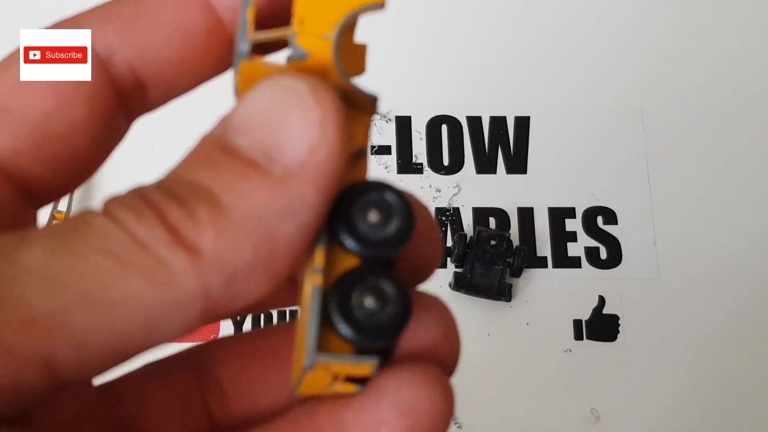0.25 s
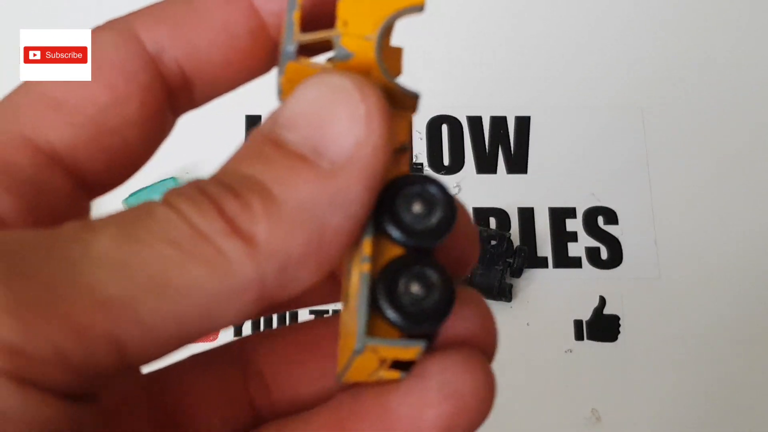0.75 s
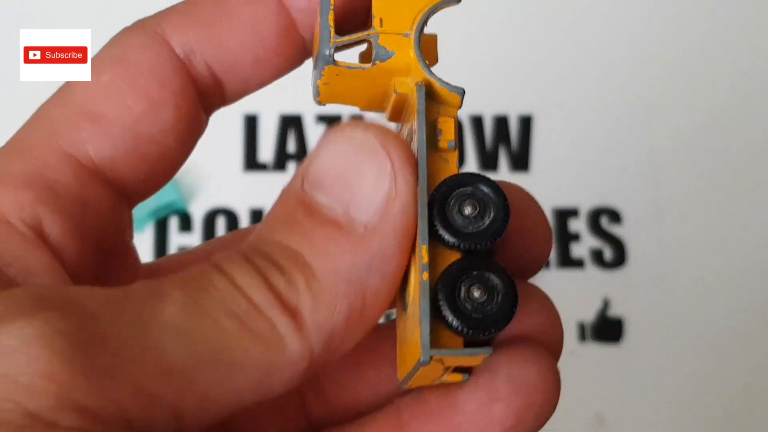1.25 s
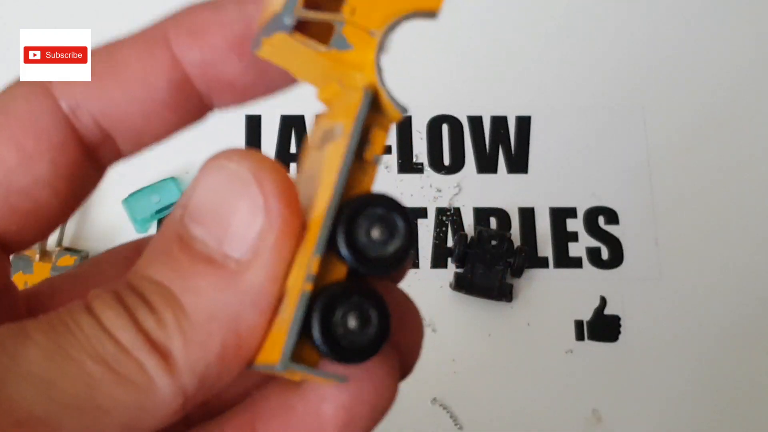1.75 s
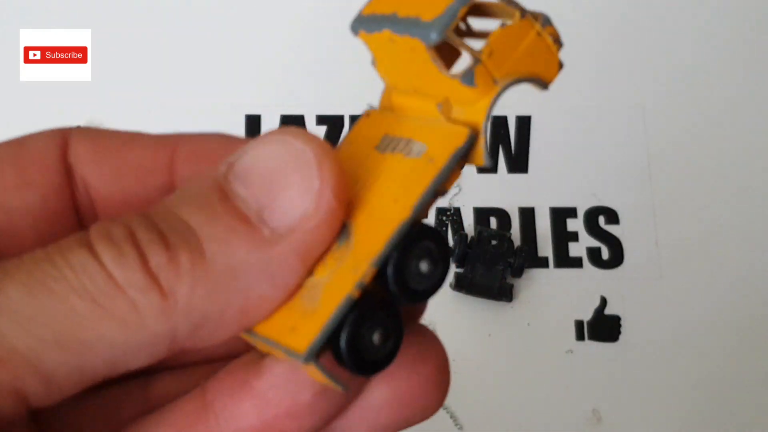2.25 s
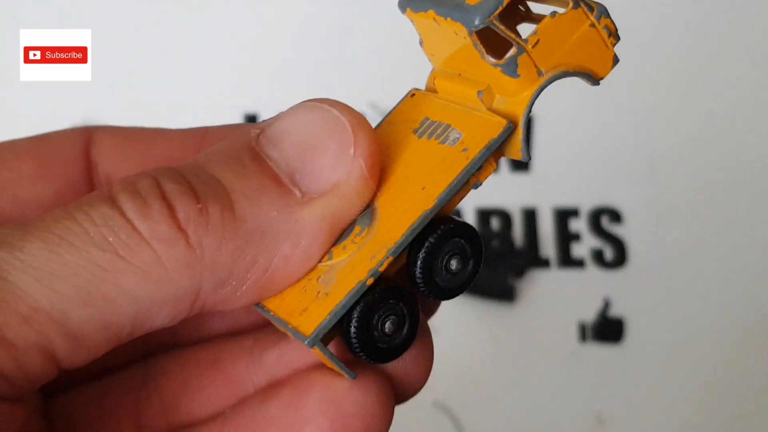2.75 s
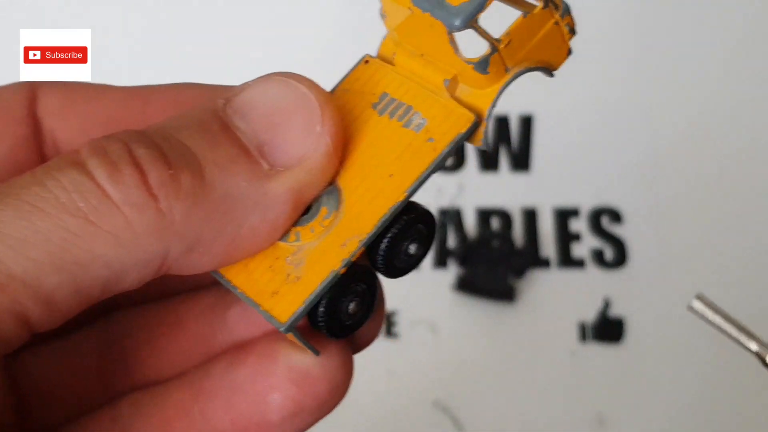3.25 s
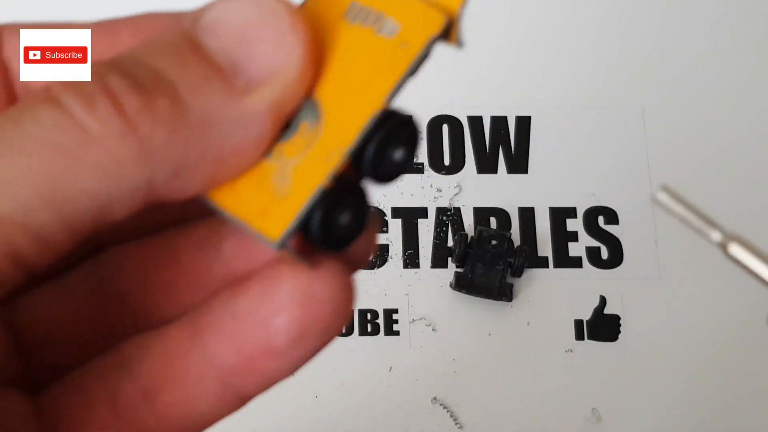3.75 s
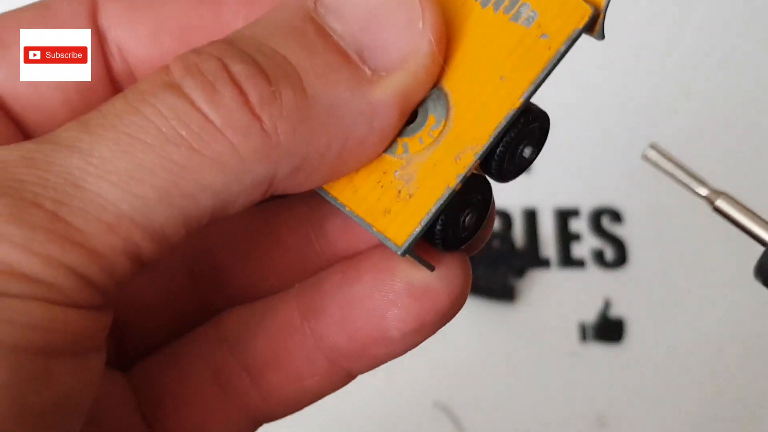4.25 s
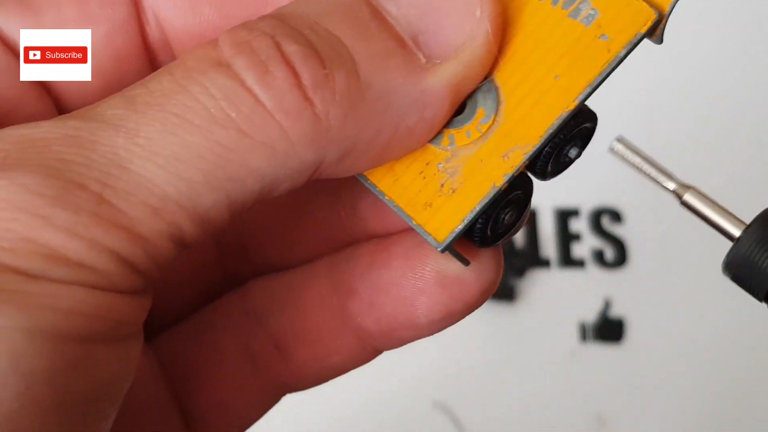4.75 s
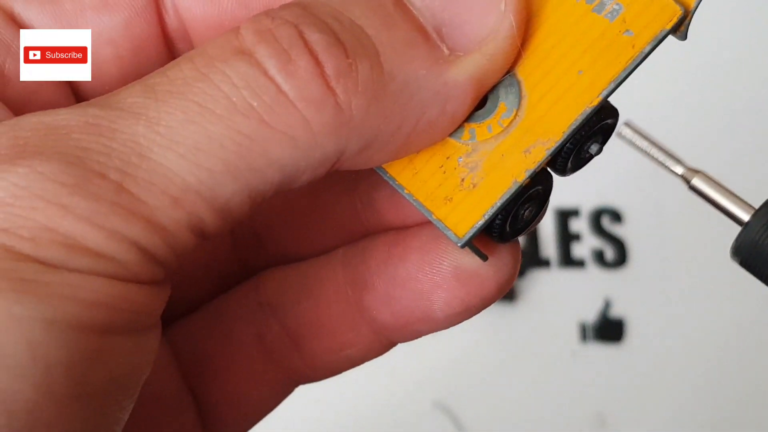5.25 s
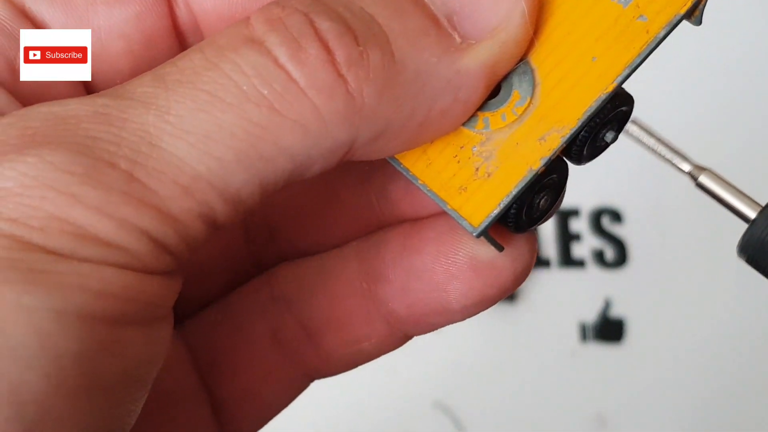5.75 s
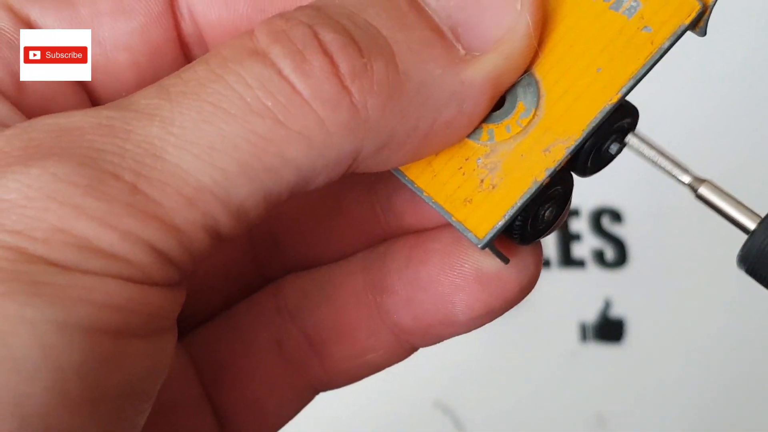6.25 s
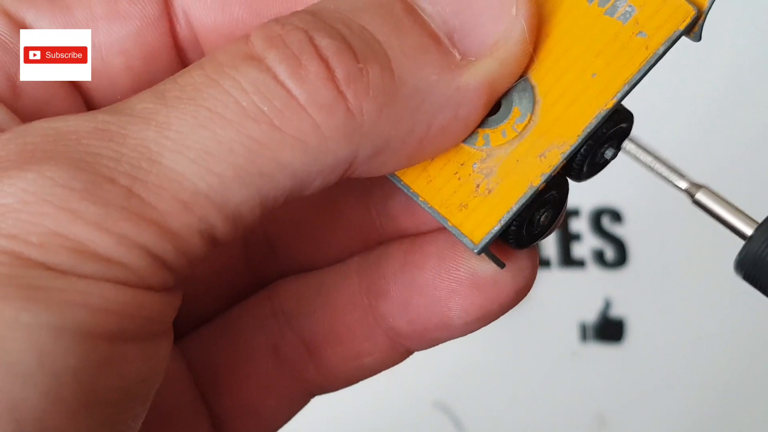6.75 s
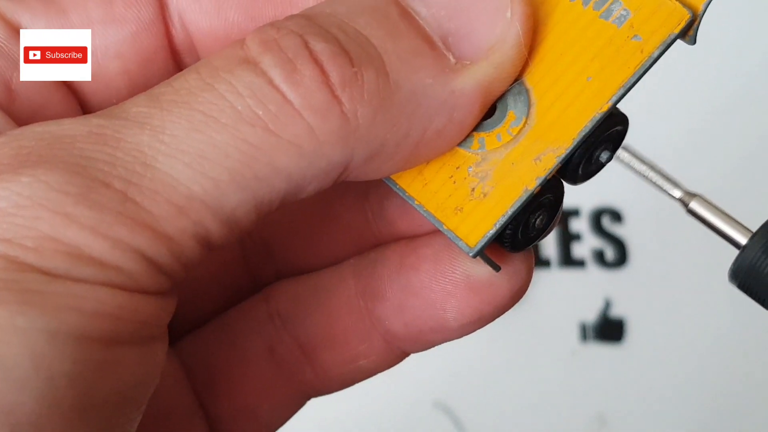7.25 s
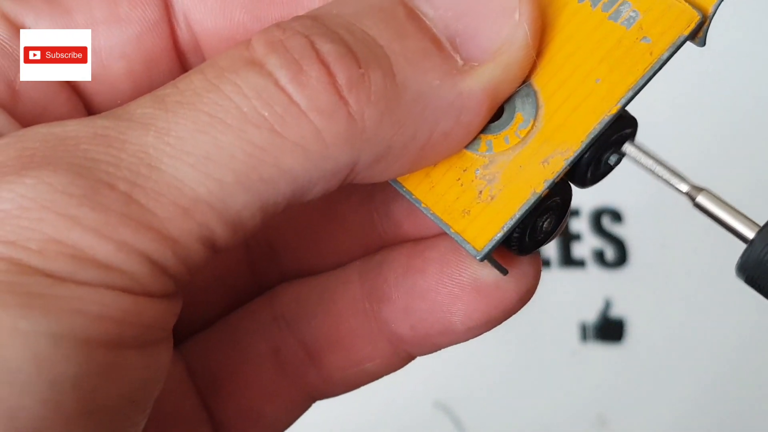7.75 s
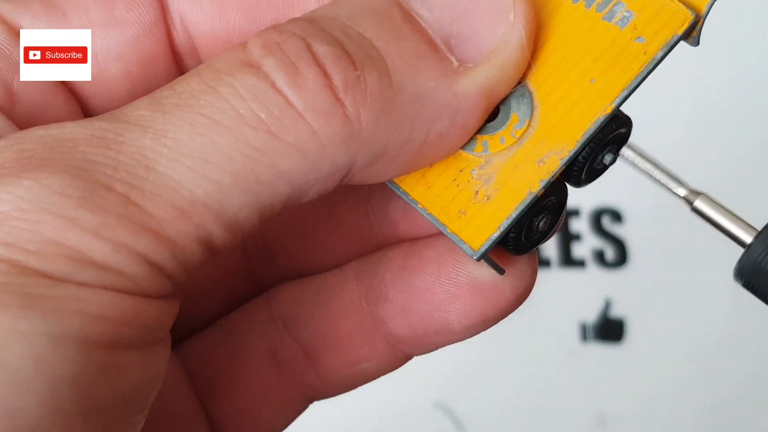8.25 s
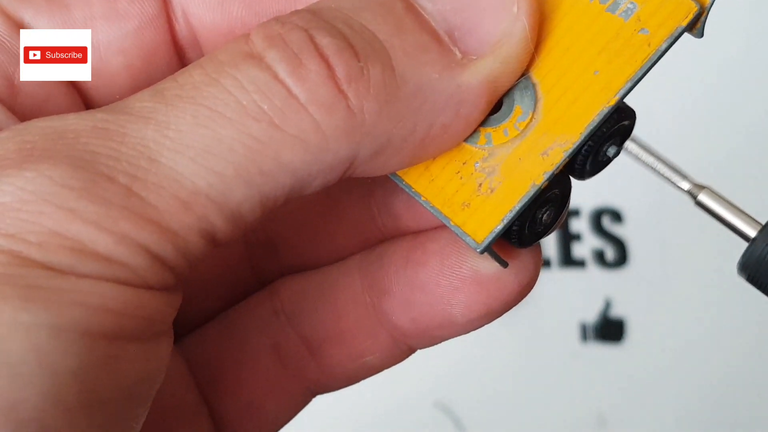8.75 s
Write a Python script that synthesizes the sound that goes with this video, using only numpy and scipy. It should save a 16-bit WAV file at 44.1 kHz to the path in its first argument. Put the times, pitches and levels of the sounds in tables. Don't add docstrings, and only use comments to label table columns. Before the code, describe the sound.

Close on a bench in a quiet room, fingers brush and tick against a small toy. A crisp switch click starts a little rotary tool, which climbs quickly from a buzzing growl to a bright, hissy whine over a hollow shell drone. Low hand bumps nudge the microphone. From about six seconds the bit touches the axle in short, irregular rasping chatters, with hard metallic bites.

```python
import sys
import numpy as np
from scipy import signal
from scipy.fft import rfft, irfft
from scipy.io import wavfile
from scipy.ndimage import uniform_filter1d

SR = 44100
rng = np.random.default_rng(int(sys.argv[2]) if len(sys.argv) > 2 else 0)


def generate_wav(signal):
    frames = np.transpose(np.atleast_2d(signal))
    scaled = np.clip(frames, -1, 1) * 32767
    pcm = np.round(scaled).astype(np.int16)
    wavfile.write(sys.argv[1], SR, pcm)


def linear_from_db(decibels):
    return 10 ** (np.asarray(decibels, float) / 20)


N = 397341
TIME = np.arange(N) / SR

# pitch_hz, level_db (per Hz)
ROOM_COLOUR = [(53, -59), (90, -2), (125, -4.5), (173, -13.5), (344, -6.5), (600, -8.5), (780, -28),
               (1320, -120)]
# pitch_hz, level_db (per Hz)
HISS_COLOUR = [(500, -8), (2500, 4.5), (7000, -2.5), (13000, 10.5)]
# pitch_hz, level_db (per Hz)
RUMBLE_COLOUR = [(12, -39), (20, -43), (38, 2.5), (59, 6.5), (112, -8), (140, -20), (200, -23), (260, -50),
                 (440, -120)]
# start_s, length_s, level_db
BUMPS = [
    (.2, 0.041, -66),
    (1.33, 0.054, -78),
    (1.48, 0.056, -59),
    (1.98, 0.076, -60),
    (2.42, 0.29, -51),
    (2.79, 0.069, -53),
    (4.3, 0.07, -66),
    (4.89, 0.12, -67),
    (6.55, 0.07, -69),
    (8.26, 0.15, -66),
]
# pitch_hz, level_db (per Hz)
SKIN_COLOUR = [(100, -13), (200, -28), (600, -9), (1000, -3.5), (2500, -14.5), (6000, -29), (11000, -23),
               (16000, -21)]
# start_s, length_s, level_db
STROKES = [
    (.005, 0.024, -56),
    (.105, 0.032, -63.5),
    (.33, 0.057, -71),
]
# start_s, peak_db, ring_hz, t60_s
TICKS = [(0.0128, -54, 1950, 0.014), (0.0165, -58, 2500, 0.006), (0.1101, -64, 1520, 0.013),
         (0.207, -41.5, 3700, 0.003), (0.3374, -63, 1500, 0.013), (0.3843, -54, 1560, 0.01),
         (0.7724, -57, 4400, 0.0081), (0.777, -41, 3530, 0.0085), (0.8087, -53, 9290, 0.014),
         (0.847, -33, 7500, 0.0072), (0.852, -48, 2530, 0.019), (0.991, -24, 11600, 0.0024),
         (0.9914, -34, 3500, 0.0064)]
# time_s, whine_db, shell_shake_db, lean_db (to the left)
MOTOR = [(.86, -65, -61, -9), (.95, -53.5, -50, -9), (1.07, -49, -57, -11), (1.21, -39.5, -46.5, -6),
         (1.4, -38.5, -47, -7), (2, -35, -46, -6.5), (2.72, -34.5, -45, -6), (4.1, -32.5, -47, -3),
         (5, -33, -45.5, -2.5), (7, -33.5, -46, -2.5), (9.01, -31, -45, -2)]
# time_s, speed_per_s (turns)
SHAFT_SPEED = [(0.86, 15.5), (1.11, 41.5), (1.2, 49.8), (1.31, 60.0), (1.45, 70.3), (1.55, 77.1),
               (1.65, 82.2), (1.82, 89.3), (2.0, 95.0), (2.23, 100.9), (2.5, 106.6), (2.75, 110.6),
               (3.1, 114.4), (4.02, 119.4), (5.07, 123.2), (6.29, 126.1), (7.2, 129.0), (9.01, 133.1)]
# pitch_hz, width_hz, level_db
SHELL_RINGS = [(765, 65, 1), (955, 130, -3)]
# pitch_hz, spread_hz, level_db
PANELS = [(1150, 200, -10.5), (1431, 78, -13), (1500, 19, 3.5), (1840, 22, -3), (1830, 17, -13),
          (2110, 62, 7), (2430, 110, 5), (2630, 196, 4), (2994, 39, -12), (3350, 260, -2.5), (3940, 35, 10),
          (5380, 37, -1), (5750, 400, -2), (7320, 570, -3), (9420, 69, 7), (10800, 420, 0.5),
          (11560, 130, -1.5), (14040, 840, -27)]
# pitch_hz, level_db (per Hz)
HOUSING = [(650, -24), (1100, 2), (1150, -4), (1360, -0.5), (1970, 4), (2040, 5.5), (2230, -5), (2700, 4.5),
           (2980, -2.5), (3690, 3), (6910, -4), (8360, -4), (11700, -2), (15000, -10), (16000, -24)]
# order (multiple of shaft speed), level_db
ORDER_BED = [(9, -10), (15, -12), (19, -17), (22, -10), (45, -9), (58, -13), (115, -11), (160, -18)]
# order, level_db
ODD_ORDERS = [(9, -7), (13, 8), (18, 7), (24, -5), (28, -11), (29, -5), (31, -6), (34, -6), (37, -7),
              (44, -5)]
# order, peak_s, spread_s, level_db
PASSING = [(40, 1.28, .06, -56), (48, 1.33, .08, -55), (63, 1.33, .06, -58), (32, 1.44, .08, -42),
           (36, 1.5, .08, -55), (68, 1.5, .06, -54), (16, 1.6, .08, -59), (70, 1.62, .09, -53),
           (45, 1.64, .05, -49), (42, 1.68, .07, -52), (38, 1.7, .08, -53), (24, 1.72, .1, -52),
           (18, 1.75, .2, -54), (66, 1.72, .08, -55), (114, 1.9, .12, -56), (122, 1.9, .1, -57),
           (65, 1.98, .08, -52), (104, 2, .14, -54), (124, 2.05, .08, -56), (64, 2.3, .07, -52),
           (17, 2.3, .3, -57), (27, 2.6, .3, -54), (106, 2.85, .3, -54), (104, 2.85, .3, -55),
           (100, 2.9, .3, -56), (11, 4.8, 1.2, -59), (13, 5.5, 1.6, -56), (14, 4.5, 1.2, -56),
           (21, 5.2, 1.5, -50), (22, 4.8, 1.2, -52), (21, 7.6, 1, -52), (12, 7.5, 1.3, -58),
           (35, 5.6, .6, -46), (17, 6, 1.5, -57), (10, 6, 1.5, -60)]
# order, peak_s, spread_s, level_db
SINGING = [(32, 1.95, 0.22, -52), (96, 1.77, 0.11, -54), (52, 1.99, 0.25, -49), (48, 2.03, 0.25, -47),
           (50, 2.07, 0.28, -51), (47, 2.07, 0.33, -56), (49, 2.16, 0.25, -52), (25, 2.16, 0.28, -45),
           (42, 2.2, 0.16, -53), (87, 2.2, 0.19, -56), (46, 2.24, 0.33, -53), (41, 2.24, 0.21, -53),
           (34, 2.28, 0.5, -50), (81, 2.28, 0.16, -55), (45, 2.31, 0.5, -53), (43, 2.31, 0.5, -57),
           (93, 2.31, 0.5, -58), (85, 2.39, 0.25, -53), (95, 2.39, 0.5, -54), (108, 2.39, 0.43, -53),
           (22, 2.39, 0.16, -45), (23, 2.43, 0.28, -41), (24, 2.43, 0.5, -43), (98, 2.51, 0.38, -51),
           (48, 2.51, 0.07, -52), (101, 2.51, 0.25, -55), (79, 2.58, 0.43, -57), (80, 2.65, 0.25, -51),
           (44, 2.65, 0.5, -51), (94, 2.69, 0.33, -51), (96, 2.69, 0.5, -53), (97, 2.73, 0.5, -54),
           (30, 2.76, 0.5, -51), (105, 2.8, 0.33, -50), (40, 2.8, 0.5, -51), (92, 2.83, 0.19, -53),
           (103, 2.87, 0.38, -53), (102, 2.87, 0.33, -56), (33, 2.91, 0.5, -51), (76, 2.94, 0.5, -55),
           (39, 2.98, 0.5, -51), (37, 3.12, 0.5, -49), (68, 3.15, 0.5, -49), (70, 3.19, 0.43, -52),
           (71, 3.22, 0.5, -51), (41, 3.33, 0.5, -47), (20, 3.33, 0.5, -54), (42, 3.33, 0.5, -49),
           (72, 3.33, 0.5, -52), (35, 3.33, 0.5, -47)]
# order, peak_s, spread_s, level_db
HOLDING = [(73, 3.43, 0.51, -56), (82, 3.46, 0.64, -58), (94, 3.81, 0.33, -57), (19, 3.84, 1.5, -53),
           (95, 3.87, 0.33, -56), (96, 3.97, 0.33, -55), (44, 4.04, 0.41, -50), (33, 4.17, 0.33, -53),
           (45, 4.21, 0.79, -54), (40, 4.24, 0.51, -48), (24, 4.31, 0.79, -50), (78, 4.47, 0.79, -55),
           (50, 4.47, 1.21, -56), (63, 4.47, 0.98, -58), (71, 4.54, 0.41, -54), (70, 4.64, 0.51, -56),
           (41, 4.7, 0.64, -52), (20, 4.7, 0.51, -49), (69, 4.7, 1.5, -56), (35, 4.77, 0.41, -45),
           (37, 5.0, 0.79, -54), (85, 5.0, 1.21, -60), (65, 5.13, 1.5, -58), (39, 5.19, 0.98, -43),
           (30, 5.23, 0.98, -49), (43, 5.32, 1.21, -54), (68, 5.39, 0.79, -50), (42, 5.39, 0.79, -49),
           (32, 5.42, 0.41, -50), (38, 5.45, 1.5, -50), (48, 5.48, 1.5, -53), (92, 5.64, 0.51, -54),
           (40, 5.64, 0.41, -51), (27, 5.84, 1.5, -54), (62, 6.12, 0.64, -54), (21, 6.16, 1.5, -48),
           (61, 6.25, 1.5, -54), (41, 6.28, 0.51, -53), (20, 6.94, 0.98, -53), (33, 7.04, 1.5, -47),
           (66, 7.22, 0.98, -53), (22, 7.25, 1.5, -49), (39, 7.69, 0.64, -55), (35, 7.75, 1.5, -43),
           (18, 7.75, 0.98, -54), (15, 7.81, 0.79, -52), (16, 8.21, 1.5, -47), (38, 8.21, 0.27, -51),
           (32, 8.36, 1.5, -42), (14, 8.39, 1.5, -53)]
# order, peak_s, spread_s, level_db
BEARING = [(7.97, 2.1, .12, -51), (7.02, 2.35, .2, -52), (8.88, 2.6, .35, -48), (6.8, 2.75, .2, -49),
           (8.56, 2.75, .2, -51), (6.73, 3.4, .4, -52), (8.12, 3.5, .5, -51), (8.88, 3.6, .4, -56),
           (6.19, 4.6, .6, -52), (7.69, 5.3, 1, -44), (8, 5, 1, -55), (5.77, 8, 1.2, -49),
           (7.56, 7, .6, -55), (8, 8, .6, -56), (6, 8.2, .6, -52), (7.69, 8, .7, -57), (7.88, 5, 1.1, -52),
           (8.13, 5.2, 1.3, -53), (8, 4, .6, -52), (7.56, 5.7, .8, -50), (6.62, 5.2, 1, -56),
           (7.02, 8.5, .4, -49), (6.35, 4.5, .6, -54)]
# start_s, length_s, grinding_db, low_body_db (against the grinding)
PRESSES = [(5.888, 0.061, -37.5, -2.5), (6.214, 0.018, -36, -3), (6.263, 0.021, -27.5, 1),
           (6.323, 0.017, -32.5, -5), (6.417, 0.068, -36.5, 2.5), (6.523, 0.031, -34.5, -1),
           (6.623, 0.063, -31.5, -2), (6.718, 0.057, -37.5, 2), (6.987, 0.063, -37.5, -1),
           (7.064, 0.026, -34.5, -2), (7.16, 0.081, -35.5, -2), (7.245, 0.086, -35.5, 3.5),
           (7.352, 0.083, -31.5, -1.5), (7.444, 0.11, -34, -3), (7.623, 0.034, -33.5, -10),
           (7.703, 0.032, -40, -8), (7.763, 0.063, -40, -7), (7.816, 0.1, -35, 1.5),
           (7.937, 0.096, -34, -0.5), (8.075, 0.062, -34.5, 0), (8.17, 0.044, -36.5, -11),
           (8.257, 0.091, -37.5, -1), (8.418, 0.18, -34.5, 4), (8.602, 0.15, -37, 1),
           (8.754, 0.14, -34, 3.5), (8.899, 0.072, -30, 2), (8.978, .05, -26, -3)]
# time_s, peak_db, low_body_db (against the peak)
BITES = [(5.913, -27, 3), (6.2457, -14, -12), (6.2715, -17, -11), (6.476, -31, -1), (6.6403, -18, 3.5),
         (6.6484, -32, -6), (6.6572, -26, 2), (6.664, -34, -3), (6.6722, -19, -5), (6.736, -26, -15),
         (7.0789, -29, -10), (7.296, -26, -5), (7.303, -27, -1), (7.319, -15, -8), (7.39, -21, -10),
         (7.457, -29, -21), (7.6433, -17, -2), (7.7214, -23, 5), (7.8427, -27, -17), (7.937, -18, -14),
         (8.012, -40, 2), (8.2802, -37, 1), (8.3013, -21, -5), (8.7783, -19, -24), (8.869, -18, 5),
         (8.8919, -13.5, -4), (8.922, -19, -16), (8.936, -12, -18), (8.9883, -15, -9)]
# pitch_hz, width_hz, level_db
AXLE = [(4540, 730, 1), (6600, 480, 4), (10040, 1700, 0.5), (11600, 500, 6.5), (13300, 2600, 1)]
# time_s, lowest_ring_hz
GRIP = [(6.2, 1920), (6.45, 1970), (6.62, 1840), (7.05, 1970), (7.22, 2030), (7.27, 1830), (8.16, 2000),
        (8.7, 1900), (9.01, 1760)]
# multiple (of the lowest ring), width_hz, level_db
TOY_BODY = [(1, 292, 7.5), (2.155, 357, 5.5)]
# pitch_hz, left_minus_right_db
PORTS = [(60, -8), (180, -17), (550, -7), (1650, -6.5), (4970, -9.5), (15000, -6.5)]

MAINS_HZ = 100
THROB = 0.3
WOBBLE_TURNS = 0.006
CLEAN, SETTLED_PER_S = 0.72, 50
BRIGHT_PER_S = 81
UPPER_DB, UPPER_PER_S, UPPER_SPREAD_PER_S = 4.5, 130, 13.6
UPPER_FADE_DB = 5
PRESS_RISE_S, PRESS_FALL_S, GRAZE_DB = 0.018, 0.015, -51.5
STROKE_RISE_S, STROKE_FALL_S, STILL_DB = 0.0015, 0.035, -82
BUMP_EDGE_S, CALM_DB, HAND_LEAN_DB = 0.041, -82, -6
ROOM_DB, QUIET_ROOM_DB, HISS_DB = -64.5, -81, -68.5
LEFT_LAG = 11
EDGE_HZ = 15800


def evened(x):
    return x / np.sqrt(np.mean(x ** 2) + 1e-20)


def read(points, hz):
    f, value = np.transpose(points)
    return np.interp(np.log(hz + 1), np.log(f + 1), value)


def follow(rows):
    s, *columns = np.transpose(rows)
    return [np.interp(TIME, s, c) for c in columns]


def colour(x, points, bumps=()):
    hz = np.fft.rfftfreq(2 ** 19, 1 / SR)
    curve_db = read(points, hz)
    for f, width, db in bumps:
        curve_db = curve_db + db * np.exp(-0.5 * ((hz - f) / width) ** 2)
    return irfft(rfft(x, 2 ** 19) * linear_from_db(curve_db))[..., :N]


def resonate(x, modes):
    out = 0
    for k, (hz, width, db) in enumerate(modes):
        out = out + (-1) ** k * linear_from_db(db) * signal.lfilter(*signal.iirpeak(hz, hz / width, SR), x)
    return out


def ring(x, hz, width):
    turn = np.exp(2j * np.pi * np.cumsum(hz) / SR)
    r = np.exp(-np.pi * width / SR)
    return 2 * (turn * signal.lfilter([1 - r], [1, -r], x / turn)).real


def wander(hz):
    size = 2 ** 14
    spectrum = rfft(rng.standard_normal(size)) / (1 + (np.fft.rfftfreq(size, N / SR / size) / hz) ** 4)
    return np.interp(np.linspace(0, size, N), np.arange(size), evened(irfft(spectrum)))


def pair(same):
    a, b = rng.standard_normal((2, N))
    return np.array([a, same * a + np.sqrt(1 - same ** 2) * b])


def swells(rows, rise_s, fall_s):
    start, length, db = np.transpose(rows)[:3, :, None]
    t = TIME[::32]
    rise = np.clip((t - start) / rise_s, 0, 1)
    return linear_from_db(db) * rise * np.exp(-np.maximum(t - start - length, 0) / fall_s)


def smooth(coarse):
    return np.interp(TIME, TIME[::32], coarse)


def add(mix, s, sound):
    part = mix[round(s * SR):][:len(sound)]
    part += sound[:len(part)]


def loose(points, level, same, lean_db):
    return level * evened(colour(pair(same), points)) * linear_from_db([[lean_db / 2], [-lean_db / 2]])


def room_level(speed, rustle):
    return linear_from_db(QUIET_ROOM_DB) + linear_from_db(ROOM_DB) * (speed / 125) ** 3 + linear_from_db(-8.5) * rustle


def hand_level(speed):
    calm = linear_from_db(CALM_DB + 3 * wander(3.1)) * (1.1 + speed / 125)
    return calm + smooth(swells(BUMPS, BUMP_EDGE_S, BUMP_EDGE_S).sum(0))


def finger_level():
    return linear_from_db(STILL_DB) + smooth(swells(STROKES, STROKE_RISE_S, STROKE_FALL_S).sum(0))


def bench(x, near_db=-15, tail_db=-14):
    t = np.arange(8000) / SR
    taps = rng.choice([-1., 1.], (2, 8000)) * (rng.random((2, 8000)) < 0.05)
    near = taps * linear_from_db(-60 * t / 0.17) * (t > 0.001)
    tail = taps * linear_from_db(-60 * t / 0.056) * (t > 0.004)
    paths = linear_from_db(near_db) * near / np.linalg.norm(near, axis=1, keepdims=True)
    paths = paths + linear_from_db(tail_db) * tail / np.linalg.norm(tail[0])
    paths[[0, 1], [LEFT_LAG, 0]] = 1
    return signal.oaconvolve(x, paths, axes=1)[:, :N]


def ticks():
    out, t = np.zeros(N), np.arange(1500) / SR
    for s, db, hz, t60 in TICKS:
        noise = rng.standard_normal(1500)
        snap = linear_from_db(-3) * signal.lfilter(*signal.butter(2, [2600, 13000], "band", fs=SR), noise)
        add(out, s, linear_from_db(db - 60 * t / t60) * (snap + resonate(noise, [(hz, hz / 4, 6)])))
    return out


def brushes():
    throb = 1 + np.cos(2 * np.pi * MAINS_HZ * TIME)
    buzz = pair(0.78) * throb * np.exp(-((TIME - 1) / 0.33) ** 2)
    return resonate(buzz, [(2440, 340, -47)])


def imbalance(turns, speed):
    out = 0
    for k, db in [(1, -64), (3, -73)]:
        out = out + linear_from_db(db + wander(8.8)) * (speed / 120) ** (2 + k) * np.cos(2 * np.pi * k * turns)
    return out


def drone(shake_db, speed):
    tuned = 10 * np.log10(1 + ((speed - UPPER_PER_S) / UPPER_SPREAD_PER_S) ** 2)
    upper_db = shake_db + UPPER_DB - tuned - UPPER_FADE_DB * np.maximum(speed - UPPER_PER_S - 5, 0)
    ripple = 1 + 0.78 * np.cos(2 * np.pi * MAINS_HZ * TIME)
    rattle = pair(0.92) * ripple * linear_from_db(0.48 * wander(19))
    drive = colour(rattle, [(500, -7), (700, 0), (1050, 11), (1300, -35)])
    out = 0
    for (hz, width, mode_db), level_db in zip(SHELL_RINGS, [shake_db, upper_db]):
        shell = resonate(resonate(drive, [(hz, width, 0)]), [(hz, 250, 0)])
        out = out + linear_from_db(level_db - 5 + mode_db) * evened(shell)
    return out


def singing(turns, rows, level_db, unlike=0.19):
    out = np.zeros((2, N))
    waver = [linear_from_db(0.5 * wander(2.2)) for _ in range(4)]
    chance = rng.standard_normal((130, 2))
    lead = 0.12 * np.cumsum(chance[:, 0])
    for k, s, spread, db in rows:
        start, shift = lead[int(k)], chance[int(k), 1]
        span = slice(max(round((s - 2.2 * spread) * SR), 0), round((s + 2.2 * spread) * SR))
        bell = np.exp(-0.5 * ((TIME[span] - s) / spread) ** 2) - 0.088
        swell = linear_from_db(db) * bell * waver[int(k) % 4][span]
        angle = 2 * np.pi * ((k * turns[span] + start) % 1 + [[unlike * shift], [0]])
        out[:, span] += swell * np.cos(angle.astype(np.float32))
    return linear_from_db(level_db) * out * (1 + THROB * np.cos(2 * np.pi * turns))


def whine(turns, speed):
    k = np.arange(9, 160)
    db = read(ORDER_BED, k) + 1.23 * rng.standard_normal(len(k))
    for order, odd_db in ODD_ORDERS:
        db = db + odd_db * (k == order)
    source = linear_from_db(1.15 * db) * np.exp(2j * np.pi * rng.random(len(k)))
    tone = 0
    for _ in range(2):
        lines = np.zeros(4097, complex)
        lines[k] = source * linear_from_db(2 * rng.standard_normal(len(k)))
        shape = np.interp(turns % 1 * 8192, np.arange(8192), irfft(lines), period=8192)
        tone = tone + linear_from_db([4 * wander(0.65), 4 * wander(0.71)]) * shape
    throb = 1 + THROB * np.cos(2 * np.pi * turns)
    ripple = 1 + 0.024 * np.cos(2 * np.pi * MAINS_HZ * TIME)
    tone_colour = [(450, -50), (800, -37), (1100, 1.5), (13500, 4.5), (15000, -2)]
    tone = colour(tone * throb * ripple, tone_colour, PANELS)
    tone = tone / np.sqrt(uniform_filter1d(tone ** 2, size=8000) + 1e-20)
    hiss_bumps = [(1710, 330, -3.5), (2370, 170, 0.5), (3210, 26, 5)]
    hiss = evened(colour(pair(0.032) * throb, HOUSING, hiss_bumps))
    share = CLEAN * np.minimum(speed / SETTLED_PER_S, 1) ** 2
    bed = np.sqrt(share) * tone + np.sqrt(1 - share) * hiss
    dull = np.clip(0.53 * (1 - speed / BRIGHT_PER_S), 0, 1)
    return dull * signal.lfilter(*signal.butter(1, 4000, fs=SR), bed) + (1 - dull) * bed


def grinding(turns):
    push = swells(PRESSES, PRESS_RISE_S, PRESS_FALL_S)
    total = push.sum(0) + linear_from_db(GRAZE_DB)
    grind_db = smooth(20 * np.log10(total))
    low_db = smooth(np.transpose(PRESSES)[3] @ push / total)
    s, peak_db, bite_low_db = np.transpose(BITES)
    at = np.minimum((s * SR).astype(int), N - 1)
    slip = np.unwrap(turns[at] % 1, period=1)
    pinned = turns - np.interp(np.arange(N), at, slip)
    strikes = np.flatnonzero(np.diff(np.floor(pinned)) > 0)
    blows = np.zeros((2, N))
    both, body = rng.standard_normal((N // 100, 2))[:len(strikes)].T
    body_db = low_db[strikes] + 2 * body
    blows[:, strikes] = linear_from_db(grind_db[strikes] + 2 + 1.6 * both + [[0], [1]] * body_db)
    blows[:, at] = linear_from_db(peak_db - 8 + [[0], [1]] * bite_low_db)
    t = np.arange(500) / SR
    burst = (1 - np.exp(-t / 0.00043)) * np.exp(-t / 0.0011)
    alike = 0.82
    scrape = linear_from_db(grind_db - 10 + 5.6 * wander(78))
    force = np.sqrt(1 - alike ** 2) * signal.oaconvolve(blows, 4 * burst[None])[:, :N] + scrape
    touching = np.clip((TIME - PRESSES[0][0]) / 0.032, 0, 1)
    grit = pair(0.13)
    knock = alike * 4 * np.linalg.norm(burst) * np.roll(blows[1], 20)
    low = touching * (force[1] * grit + knock)
    high = touching * force[0] * grit / np.sqrt(1.01 - alike ** 2)
    rung = resonate(low, AXLE[:2]) + resonate(high, AXLE[2:])
    lowest_hz, = follow(GRIP)
    for multiple, width, db in TOY_BODY:
        rung = rung + linear_from_db(db) * ring(low, multiple * lowest_hz, width)
    return colour(rung, [(600, -5.5), (1200, 0)], [(2480, 110, -0.45), (2930, 81, 1.1)])


def scene():
    speed, = follow(SHAFT_SPEED)
    whine_db, shake_db, lean_db = follow(MOTOR)
    on = np.clip((TIME - 0.85) / 0.02, 0, 1)
    wobble = sum(np.sin(2 * np.pi * hz * TIME + hz) / np.sqrt(hz) for hz in np.geomspace(2, 10, 5))
    turns = np.cumsum(speed * on) / SR + WOBBLE_TURNS * wobble

    motor = linear_from_db(whine_db - 3.5) * whine(turns, speed)
    motor = motor + drone(shake_db, speed) + imbalance(turns, speed)
    motor = motor + singing(turns, PASSING + SINGING + HOLDING, 0.82)
    motor = motor + singing(turns, BEARING, 1, unlike=0.054)
    tool = bench(on * motor + grinding(turns) + on * brushes())
    clicks = bench(ticks() * np.ones((2, 1)), near_db=-22, tail_db=-15)
    lean = linear_from_db([[0.5], [-0.5]] * (lean_db + 5))

    rustle = finger_level()
    rumble = hand_level(speed)
    fingers = loose(SKIN_COLOUR, rustle, 0.13, 0.21)
    hand = loose(RUMBLE_COLOUR, rumble, 0.41, HAND_LEAN_DB)
    room = loose(ROOM_COLOUR, room_level(speed, rustle), 0.7, -0.18)
    hiss = loose(HISS_COLOUR, linear_from_db(HISS_DB), 0.29, 0)
    return linear_from_db(2) * (tool + clicks) * lean + fingers + hand + room + hiss


def top_cut(x):
    return signal.sosfilt(signal.butter(12, 16150, fs=SR, output="sos"), x)


def record(dry):
    ports = []
    for sound, sign in zip(dry, [1, -1]):
        curve = [(hz, sign * db / 2) for hz, db in PORTS]
        ports.append(colour(sound, curve + [(EDGE_HZ, 0), (EDGE_HZ + 200, -120)]))
    return top_cut(np.array(ports))


dry = scene()
out = record(dry)
generate_wav(out)
```